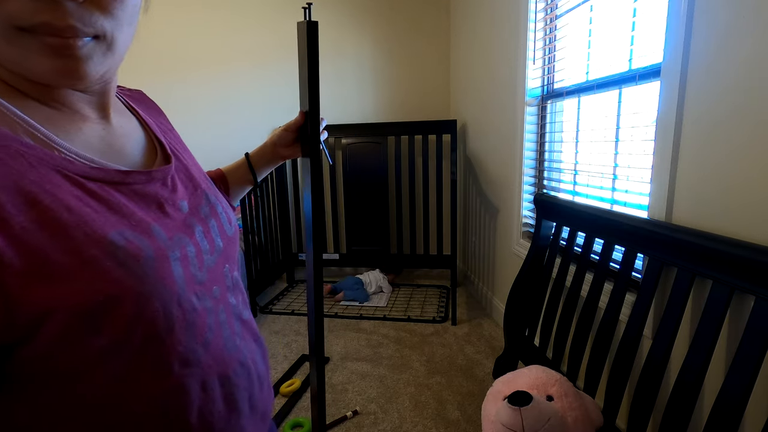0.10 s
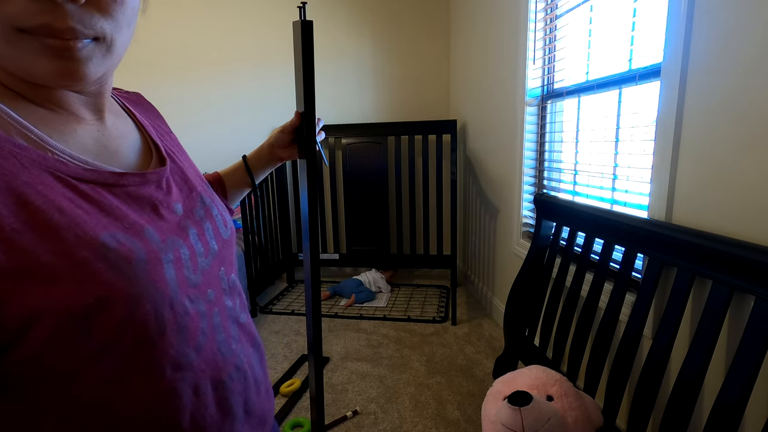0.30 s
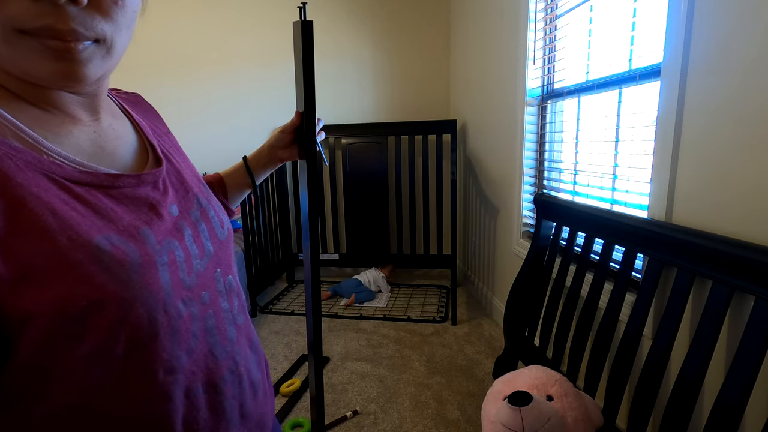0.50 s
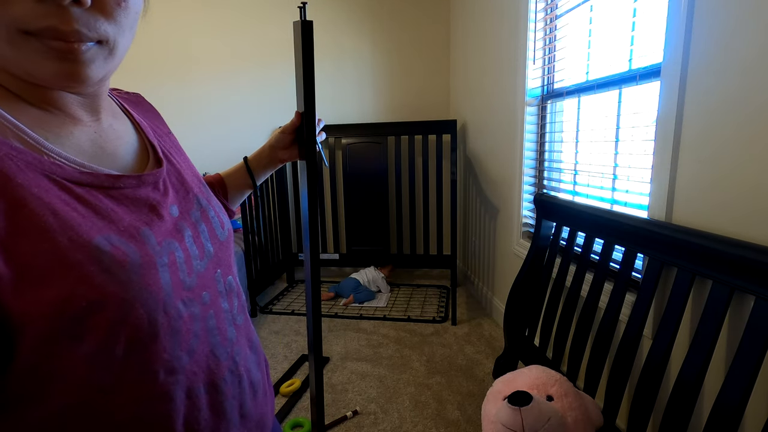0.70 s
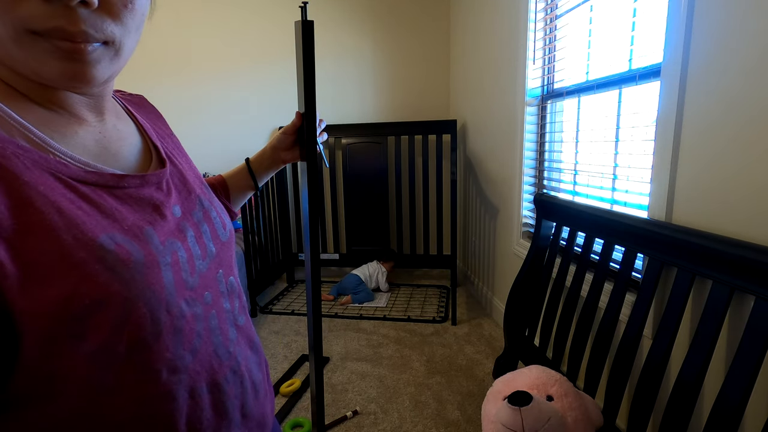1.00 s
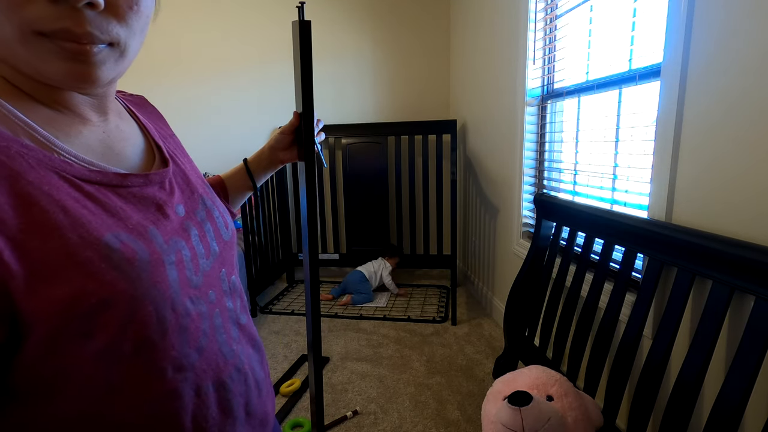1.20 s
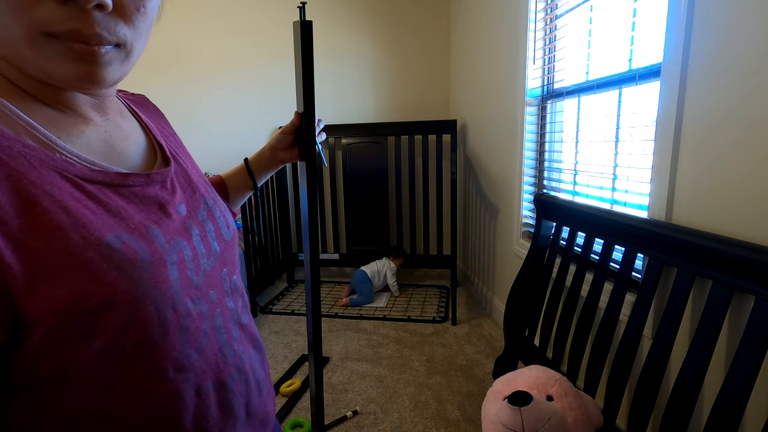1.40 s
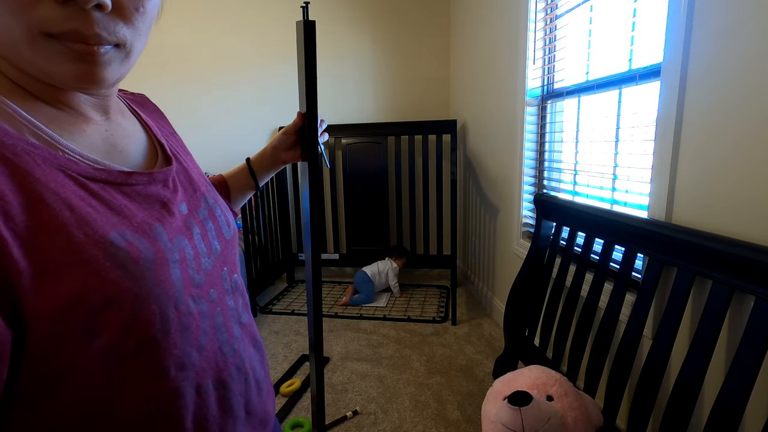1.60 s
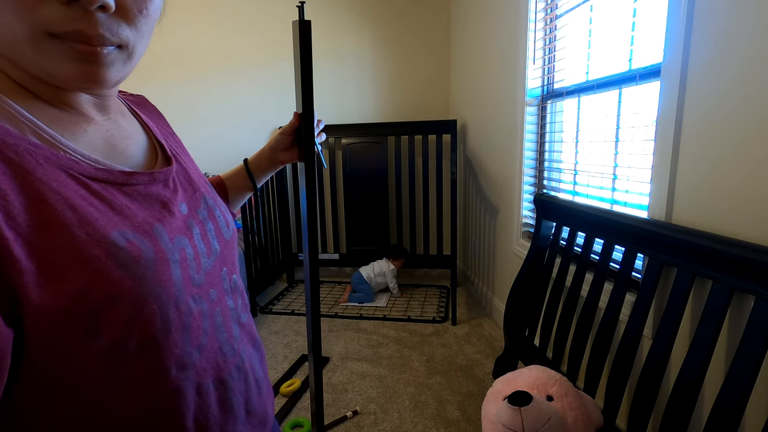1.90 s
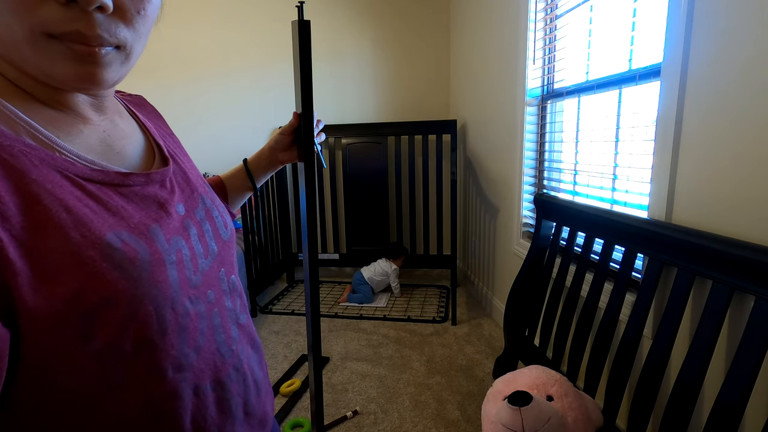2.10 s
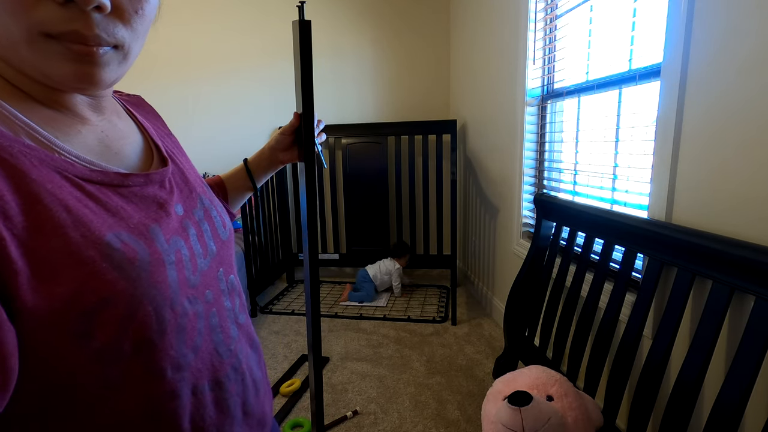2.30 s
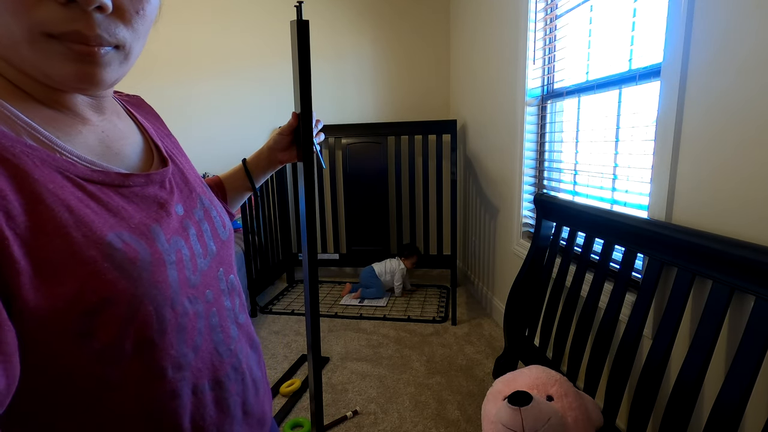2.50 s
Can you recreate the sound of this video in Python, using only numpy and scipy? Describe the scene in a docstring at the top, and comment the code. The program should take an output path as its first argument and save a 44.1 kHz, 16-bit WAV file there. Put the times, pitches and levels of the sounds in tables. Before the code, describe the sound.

A metal bar clatters against a crib frame with low thumps, scrapes along it in short strokes, then clanks and chatters to rest. Tiny high clinks come in between, heard nearby in a small carpeted bedroom.

```python
"""A metal crib bar thumps and clatters against its frame, scrapes along it in short strokes, clanks
once and chatters to rest, as it is handled in a small carpeted bedroom. Impacts and stick-slip friction
excite the damped modes of bar and frame, and the frame's weight sets the floor booming.
A small loose fitting clinks very high, and a faint squeak ends one slide.
A soft rubbing hiss and a low room rumble lie underneath."""
import sys
import numpy as np
from scipy import signal
from scipy.fft import rfft, irfft, next_fast_len
from scipy.io import wavfile

SR = 44100
rng = np.random.default_rng(int(sys.argv[2]) if len(sys.argv) > 2 else 0)


def dump(signal):
    """Clip the signal to [-1, 1] and save it as 16-bit WAV at the path in sys.argv[1]."""
    limited = np.clip(np.atleast_2d(signal).T, -1, 1)
    pcm = np.round(limited * 32767).astype(np.int16)
    wavfile.write(sys.argv[1], SR, pcm)


N = 116865
RING_SIZE = 32768
T = np.arange(N) / SR
AGE = T[:RING_SIZE]
SIDES = np.array([[1], [-1]])  # left, right

# modes of the bar: f/Hz and level/dB (levels in all tables are relative)
BAR_HZ = [909, 1415, 1688, 1875, 1920, 1941, 2003, 2036, 2059, 2187, 2303, 2865, 3214, 3275, 3318, 3633,
          4121]
BAR_DB = [-2, -6, 7, -8, -6, -4, -6, -4, 2, -3, -2, -5, 0, -6, 0, 0, -3]
# modes of the frame: f/Hz and level/dB
FRAME_HZ = [225, 517, 909, 954, 984, 1060, 1215, 1248, 1486, 1550, 1688, 1891, 2060, 2221, 2832]
FRAME_DB = [1.5, -9, -6, -1.5, -1, -4, 4.5, -1.5, -4, -4.5, -7.5, 2.5, -6.5, -0.5, -12]
# left minus right: f/Hz, level/dB
BALANCE = [(100, 1.3), (380, 0.1), (700, 2), (1300, 3), (2400, 5.5), (4400, 4), (9000, 0)]
# lead of left over right: f/Hz, phase/rad
PHASE_LEAD = [(300, 0), (1400, -.2), (2100, -.6), (2900, -1.2), (3900, .2), (5500, 0), (9400, -.7)]


def amp(db):
    """Amplitude ratio of a level in decibels."""
    return 10 ** (np.asarray(db) / 20)


def at_hz(points, hz):
    """Interpolation along logarithmic frequency."""
    f, values = np.transpose(points)
    return np.interp(np.log(np.maximum(hz, 1)), np.log(f), values)


def envelope(rows):
    """Amplitude envelope from rows of t/s, level/dB."""
    return amp(np.interp(T, *np.transpose(rows)))


def lowpass(x, edge_hz):
    """Second-order roll-off above the edge frequency."""
    return signal.sosfilt(signal.butter(2, edge_hz, fs=SR, output="sos"), x + 1e-18)


def convolve(x, response):
    """Superposition: each sample of the drive launches the stereo impulse response."""
    return signal.fftconvolve(np.atleast_2d(x), response, axes=-1)[:, :N]


def colour(pair, spectrum):
    """Minimum-phase filtering and mixing make two independent signals a partly coherent stereo pair."""
    # likeness of left and right: f/Hz, coherence
    coherence = [(100, 0.89), (300, 0.8), (700, 0.91), (1400, 0.63), (2100, 0.79), (3300, 0.62),
                 (7000, 0.34), (15000, 0.31)]
    size = next_fast_len(pair.shape[1] + 4096, True) * 2
    hz = np.arange(size // 2 + 1) * SR / size
    gain = amp(at_hz(spectrum, hz))
    cepstrum = irfft(np.log(gain / np.sqrt(np.mean(gain ** 2))))  # unit power gain
    cepstrum[1:size // 2] *= 2  # folding makes the filter causal
    cepstrum[size // 2 + 1:] = 0
    response = np.exp(rfft(cepstrum) + 1j * SIDES * at_hz(PHASE_LEAD, hz) / 2)
    mid, side = rfft(pair, size)
    alike = at_hz(coherence, hz)
    stereo = np.sqrt((1 + alike) / 2) * mid + SIDES * np.sqrt((1 - alike) / 2) * side
    pan = amp(SIDES * at_hz(BALANCE, hz) / 2)
    return irfft(stereo * response * pan)[:, :pair.shape[1]]


def noise(spectrum):
    """Stationary Gaussian noise with the given spectrum."""
    return colour(rng.standard_normal((2, N)), spectrum)


def wash(spectrum, t60):
    """Modal overlap: dense resonances merge into noise that falls 60 dB in t60 seconds."""
    return colour(rng.standard_normal((2, RING_SIZE)) * amp(-60 * AGE / t60), spectrum)


def ring(modes, spread=0.):
    """Free vibration: damped sines (f/Hz, level/dB, t60/s); spread/rad scatters the stereo phase."""
    out = np.zeros((2, RING_SIZE))
    for k, (hz, db, t60) in enumerate(modes):
        decay = amp(db - 60 * AGE / t60 + SIDES * at_hz(BALANCE, hz) / 2)
        lead = at_hz(PHASE_LEAD, hz) / 2 + spread * (rng.random() - .5)
        out += (-1) ** k * decay * np.sin(2 * np.pi * hz * AGE + SIDES * lead)
    return out


def metal(pitches, levels, t60, spread, damping=1 / 4):
    """Modal damping: decay time falls from the lowest mode's t60 as frequency ** -damping."""
    modes = [(hz, db, t60 * (pitches[0] / hz) ** damping) for hz, db in zip(pitches, levels)]
    return ring(modes, spread)


def contacts(rows):
    """Impact pulses: a softer contact lasts longer and so carries less treble."""
    out = np.zeros(N + RING_SIZE)
    for start, db, edge_hz in rows:
        pulse = amp(db) * lowpass(signal.unit_impulse(512), edge_hz)
        out[int(start * SR):][:len(pulse)] += pulse
    return out[:N]


def cracks(rows, t60, buzz_db, buzz_t60):
    """Impact transients: each is a noisy crack followed by a weaker buzz of tiny rebounds."""
    out = np.zeros((2, N + RING_SIZE))
    age = AGE[:RING_SIZE // 4]
    decay = amp(-60 * age / t60) + amp(buzz_db - 60 * age / buzz_t60)
    for start, db, edge_hz in rows:
        crack = lowpass(decay * rng.standard_normal((2, len(age))), edge_hz)
        out[:, int(start * SR):][:, :len(age)] += amp(db) * crack
    return out[:, :N]


def background():
    """Amplitude-modulated noise: rubbing hiss and handling rumble over the steady room noise."""
    # envelopes: t/s, level/dB
    rub_levels = [(0, -62.5), (.15, -54.5), (.3, -42), (.6, -59), (.98, -56.5), (1.1, -70), (1.24, -55.5),
                  (1.32, -62), (1.45, -51), (1.55, -46.5), (1.64, -61.5), (2.2, -62), (2.42, -55),
                  (2.51, -54), (2.65, -57.5)]
    rumble_levels = [(0, -47.5), (.5, -43), (1.0, -52.5), (1.24, -51.5), (1.32, -42.5), (1.43, -37.5),
                     (1.52, -39), (1.62, -47.5), (1.85, -47), (2.2, -44.5), (2.65, -59)]
    # spectral densities: f/Hz, level/dB
    rub_spectrum = [(500, -13), (1500, -3), (3000, -1.5), (5000, -3.5), (7500, -8.5), (10000, -15),
                    (13000, -26), (16000, -28)]
    rumble_spectrum = [(20, -15), (36, -17), (46, -1), (56, -16), (100, -17), (170, -14.5), (240, -18),
                       (330, -30), (1000, -49), (4000, -93)]
    room_spectrum = [(18, -42), (30, -8), (154, -17.5), (281, -43), (881, -21.5), (1060, -21), (1270, -32),
                     (1650, -23), (2490, -47.5), (15000, -65.5)]
    hiss = envelope(rub_levels) * noise(rub_spectrum)
    rumble = envelope(rumble_levels) * noise(rumble_spectrum)
    return hiss + rumble + amp(-60) * noise(room_spectrum)


def squeak():
    """A friction tone sags in pitch; random modulation widens it into a narrow band."""
    # course of the tone: t/s, f/Hz, level/dB
    glide = [(.92, 2020, -70), (.95, 1990, -54), (1.01, 1930, -53), (1.05, 1860, -55), (1.09, 1840, -70)]
    times, hz, db = np.transpose(glide)
    waver = lowpass(rng.standard_normal((2, N)), edge_hz=70)
    waver = waver / waver.std()
    phase = 2 * np.pi * np.cumsum(np.interp(T, times, hz)) / SR
    swell = amp(np.interp(T, times, db)) * (T > times[0]) * (T < times[-1])
    return swell * (waver[0] * np.sin(phase) + waver[1] * np.cos(phase))


def fitting():
    """Beating: the loose fitting ticks and its close modes interfere; the room prolongs the ring."""
    # clinks: t/s, level/dB
    clinks = [(.637, -61.5), (.787, -34.5), (.8435, -24.5), (1.709, -49), (1.8245, -23), (1.866, -35),
              (2.3405, -25), (2.372, -29.5), (2.547, -43.5), (2.5775, -29), (2.602, -26.5)]
    # modes of the fitting: f/Hz and level/dB
    mode_hz = [9410, 9438, 9462, 14570, 14605]
    mode_db = [-1.5, -15, -4, -33, -27]
    tick = amp(-16.5) * wash([(2000, -20), (6000, 10), (10000, 2), (16000, -39)], t60=0.05)
    room_spectrum = [(8600, -44), (9300, -24.5), (9440, -3.5), (9580, -35), (10300, -52.5)]
    room = amp(-10) * wash(room_spectrum, t60=0.26)
    ringing = amp(2) * metal(mode_hz, mode_db, t60=0.12, spread=2.4, damping=0)
    pulses = contacts([(start, db, 16400) for start, db in clinks])
    return convolve(pulses, ringing + tick + room)


def floor_thumps():
    """Impact excitation: the frame's weight sets the floor's low modes booming briefly."""
    # bumps: t/s, level/dB, boom f/Hz
    bumps = [(0.1682, -16, 102), (0.2496, -7.5, 118.4), (.302, -8.5, 111.6), (0.3609, -10, 102),
             (0.424, -20, 106), (.479, -20.5, 103.3), (0.643, -34, 104), (.76, -32, 116), (1.696, -32, 106),
             (1.844, -32.5, 106), (1.903, -25, 109), (2.332, -30, 104)]
    # modes of the floor: f/Hz, level/dB, t60/s
    modes = [(99, -15.5, 0.61), (144.6, -13.5, 0.25), (182.3, -18, 0.16), (227.3, -13.5, 0.27),
             (295, -22, 0.081), (344, -19, 0.16), (493, -26, 0.36), (646, -23.5, .1)]
    out = np.zeros((2, N + RING_SIZE))
    rise = 1 - np.exp(-AGE / 0.0085)
    for start, db, hz in bumps:
        boom = ring([(hz, 0, 0.15)]) * rise + ring(modes)
        out[:, int(start * SR):][:, :RING_SIZE] += amp(db) * boom
    return out[:, :N]


def scraping():
    """Stick-slip friction: dense tiny slips under each stroke rasp and drive the frame and bar."""
    # strokes: start t/s, rise t/s, end t/s, first and last level/dB, bass and treble edge f/Hz
    strokes = [(0.533, 0.0085, .6, -33.5, -33, 300, 3200), (0.598, 0.048, 0.81, -25.5, -28, 90.5, 3830),
               (0.821, 0.0072, 0.92, -31.5, -40, 152, 2550), (1.338, 0.0043, 1.95, -50, -52.5, 100, 1080),
               (1.425, 0.05, 1.6, -48.5, -46.5, 150, 2600), (1.687, 0.0099, 1.787, -30.5, -28, 290, 3900),
               (1.781, 0.0072, 1.835, -44, -31.5, 300, 1980), (1.863, 0.0055, 1.964, -29.5, -32, 150, 1890),
               (2.0, 0.016, 2.2, -39, -35.5, 148, 1480), (2.22, 0.027, 2.235, -23, -19, 394, 4100),
               (2.278, 0.065, 2.319, -21, -19.5, 100, 3890), (2.482, 0.0095, 2.49, -39, -37.5, 120, 2380),
               (2.551, 0.013, 2.66, -28, -41, 360, 2130)]
    # spectral density of the rasp: f/Hz, level/dB
    spectrum = [(41, -38.5), (70, -11), (220, -7.5), (356, -3.5), (402, -14), (491, -5), (705, -7),
                (879, -8), (1190, -2), (1310, -11), (1450, 0.5), (1640, -6.5), (2040, -3), (2400, -9),
                (2990, -8.5), (3440, -16), (4040, -19.5), (5040, -26), (8500, -36), (11000, -93),
                (18700, -120)]
    slips_per_s, slip_spread_db, release_t60 = 5000, 2.2, 0.24
    slips = (rng.random((2, N)) < slips_per_s / SR) * rng.choice([-1, 1], (2, N))
    slips = slips * amp(slip_spread_db * np.minimum(rng.exponential(1, (2, N)), 4))
    slips = slips / slips.std()
    drive = np.zeros((2, N))
    for start, rise, end, first_db, last_db, bass_hz, edge_hz in strokes:
        held_db = np.interp(T, [start + rise, end], [first_db, last_db])
        release_db = 60 * np.maximum(T - end, 0) / release_t60
        strength = np.clip((T - start) / rise, 0, 1) * amp(held_db - release_db)
        stroke = np.roll(slips, rng.integers(N), axis=1) * (strength + 1e-12)
        highpass = signal.butter(1, bass_hz, "high", fs=SR, output="sos")
        drive += lowpass(signal.sosfilt(highpass, stroke), edge_hz)
    rasp = amp(1.5) * colour(drive, spectrum)
    room = amp(-35.5) * lowpass(wash(spectrum, t60=0.43), edge_hz=1180)
    frame_ring = amp(-44) * metal(FRAME_HZ, FRAME_DB, t60=0.38, spread=1.0)
    bar_ring = amp(-56) * metal(BAR_HZ, BAR_DB, t60=.6, spread=1.0)
    return rasp + convolve(drive[0], frame_ring + bar_ring + room)


def frame_clanks():
    """Resonance: each blow on the frame gives a short crack and a low metallic ring."""
    # blows: t/s, level/dB, treble edge f/Hz
    blows = [(.1665, -30, 6040), (.1685, -15, 600), (.642, -18.5, 4940), (.877, -25.5, 1690),
             (1.342, -36, 896), (1.428, -35, 1200), (1.616, -37, 1680), (1.6935, -33.5, 4000),
             (1.8415, -5.5, 5200), (1.8452, -9, 5160), (1.9255, -24.5, 4000), (2.1185, -20, 1980),
             (2.3905, -11.5, 2500), (2.3975, -20, 1940), (2.555, -29, 1980)]
    # spectral density of a clank: f/Hz, level/dB
    spectrum = [(71, -62), (120, -12), (228, -2.5), (376, -10.5), (425, -20.5), (499, -8), (766, -23.5),
                (966, 2.5), (1310, -6.5), (1940, -6.5), (2040, 0.5), (2190, -10), (3300, -3), (3490, -16),
                (4170, -6.5), (5850, -27.5), (8500, -27.5), (11000, -69.5), (18700, -120)]
    crack = amp(-5) * colour(cracks(blows, t60=0.042, buzz_db=-11.5, buzz_t60=.14), spectrum)
    room = amp(-16) * lowpass(wash(spectrum, t60=0.22), edge_hz=4700)
    ringing = amp(-25) * metal(FRAME_HZ, FRAME_DB, t60=0.39, spread=0.39)
    return crack + convolve(contacts(blows), ringing + room)


def bar_clatter():
    """Impulse response: each strike on the frame cracks, rings the bar's modes and reverberates."""
    # strikes: t/s, level/dB, treble edge f/Hz
    strikes = [(.2488, -1.5, 5960), (.2562, 1, 7060), (.2595, -6.5, 5860), (.2640, -6.5, 4440),
               (.2745, -2, 5960), (.2930, -8, 4930), (.3010, 0.5, 6400), (.3098, -4.5, 5850),
               (.3198, -2, 4400), (.3412, -4.5, 4950), (.3462, -8.5, 5000), (.3530, -5, 6500),
               (.3598, 0, 10000), (.3788, -8, 6060), (.3988, -1.5, 9050), (.4080, -1.5, 10200),
               (.4135, -9, 7000), (.4218, -2.5, 8000), (.4365, -9, 5000), (.4410, -4.5, 7000),
               (.4490, -15.5, 6000), (.4558, -3.5, 5000), (.4652, -10.5, 5470), (.4750, -11.5, 4540),
               (.4840, -11.5, 4800), (.4992, -15.5, 5000), (.5122, -13.5, 4270), (.5370, -23, 5300),
               (.5440, -20.5, 4590), (1.9735, -10, 5100), (2.0272, -12.5, 6000), (2.0805, -16, 5600),
               (2.1205, -23, 2900), (2.1255, -41, 4000), (2.3895, -25, 4470)]
    # spectral density of a strike: f/Hz, level/dB
    spectrum = [(120, -31.5), (210, -13), (340, -12), (400, -28), (490, -13.5), (800, -15.5), (920, -7.5),
                (1250, -10.5), (1560, -11), (1700, -6), (2030, 2.5), (2300, -7.5), (2520, -7), (2850, -7),
                (3260, 0.5), (3480, -11), (3800, -3.5), (4250, -11.5), (4600, -8.5), (5400, -15),
                (6000, -23.5), (9000, -32), (16000, -39)]
    crack = amp(-2.5) * colour(cracks(strikes, t60=.02, buzz_db=-25, buzz_t60=.1), spectrum)
    room = amp(-21.5) * lowpass(wash(spectrum, t60=0.67), edge_hz=1980)
    ringing = amp(-31) * metal(BAR_HZ, BAR_DB, t60=.75, spread=.8, damping=.7)
    return crack + convolve(contacts(strikes), ringing + room)


def scene():
    """Superposition: the pressures of all sources add at the microphones."""
    crib = bar_clatter() + frame_clanks() + scraping() + squeak()
    return crib + floor_thumps() + fitting() + background()


def record(dry):
    """Saturation rounds the loudest peaks; a steep low-pass stops the band above 17 kHz."""
    rounded = dry / (1 + dry ** 6) ** (1 / 6)
    return signal.sosfilt(signal.cheby2(14, 60, 17000, fs=SR, output="sos"), rounded)


dry = scene()
out = record(dry)
dump(out)
```